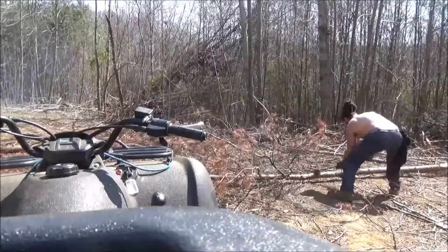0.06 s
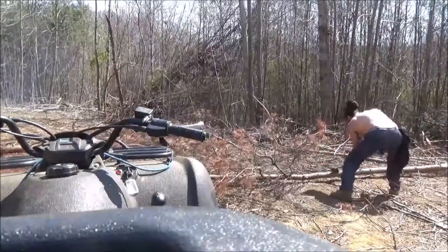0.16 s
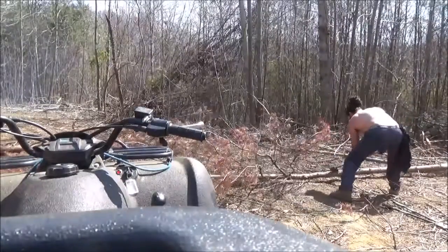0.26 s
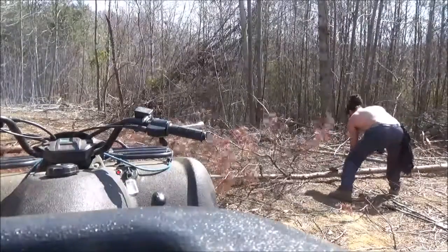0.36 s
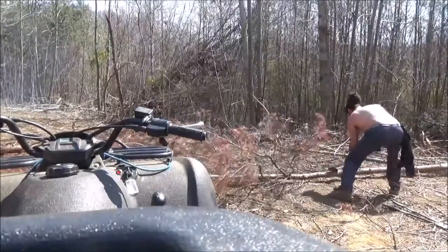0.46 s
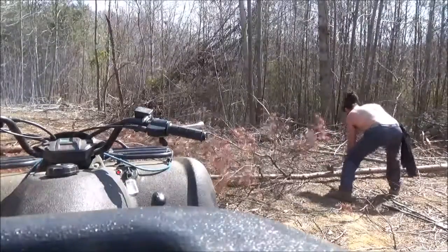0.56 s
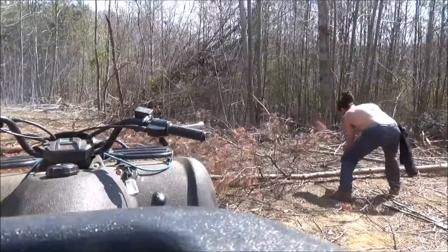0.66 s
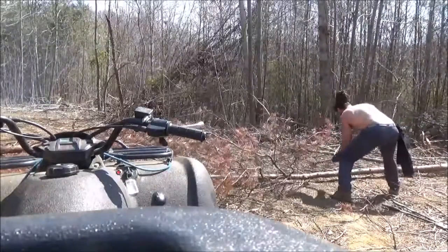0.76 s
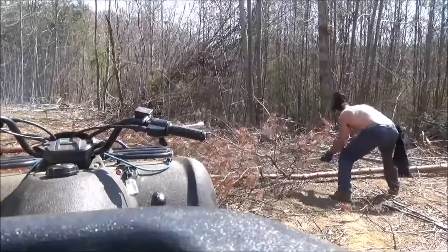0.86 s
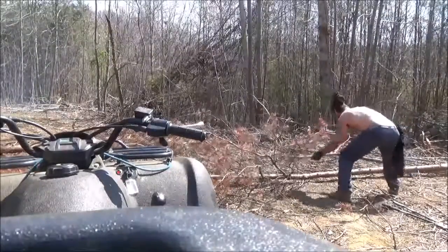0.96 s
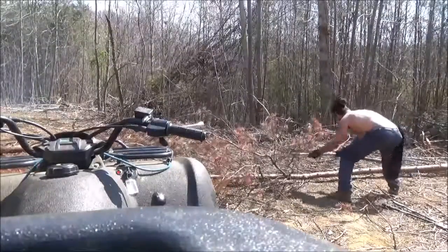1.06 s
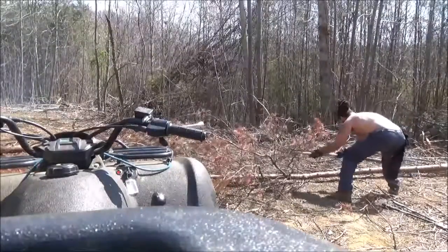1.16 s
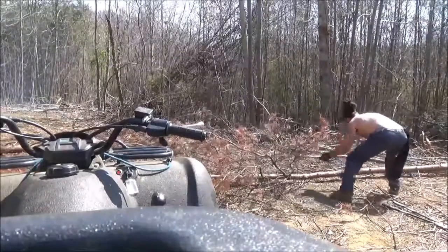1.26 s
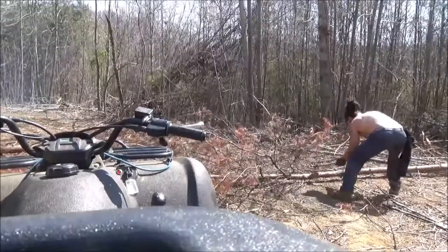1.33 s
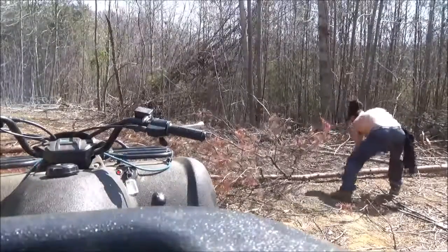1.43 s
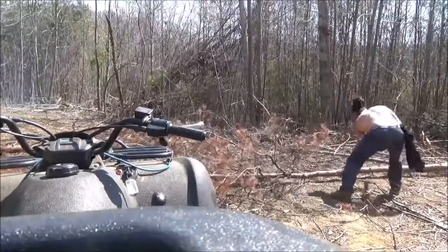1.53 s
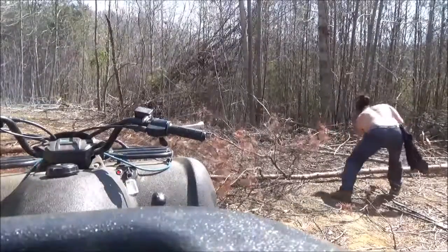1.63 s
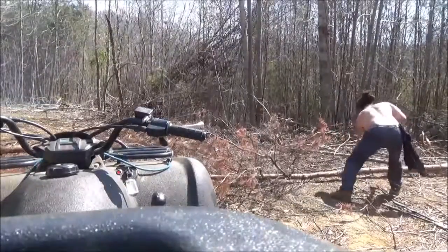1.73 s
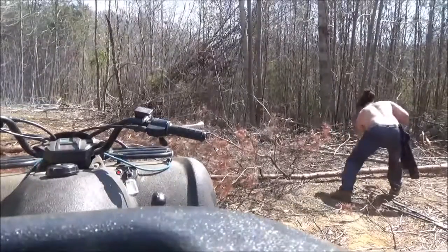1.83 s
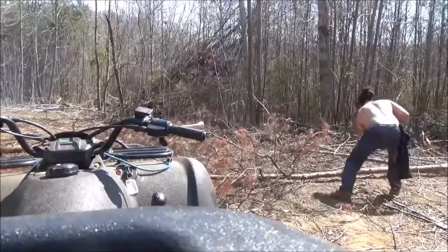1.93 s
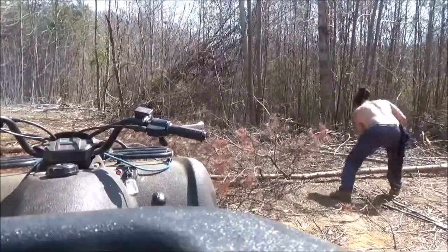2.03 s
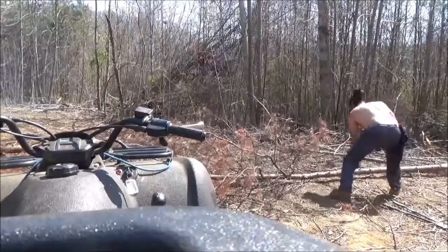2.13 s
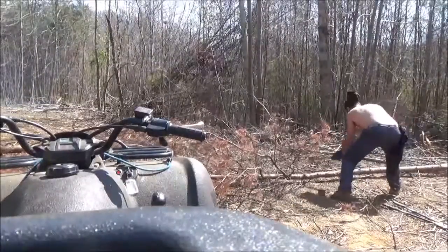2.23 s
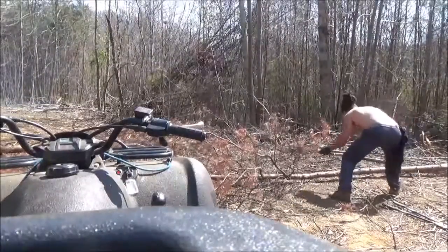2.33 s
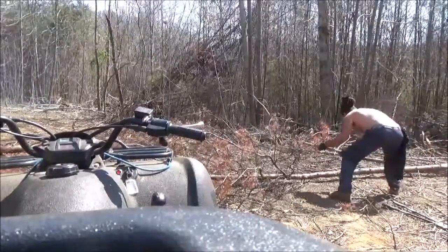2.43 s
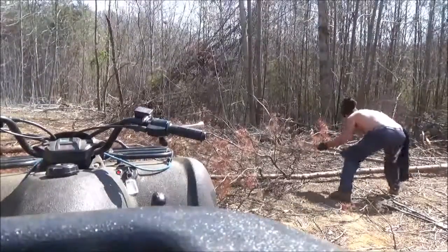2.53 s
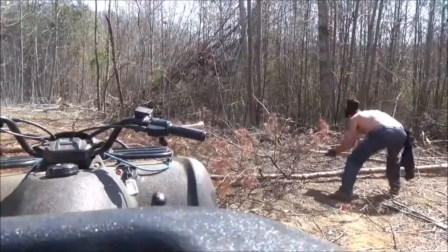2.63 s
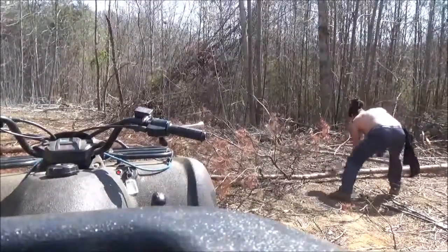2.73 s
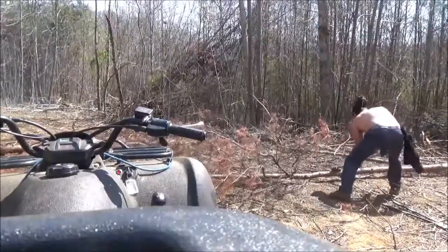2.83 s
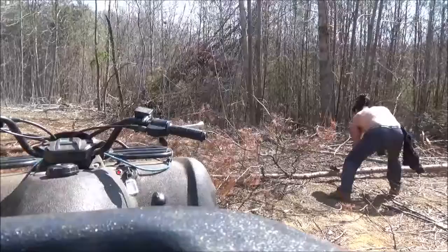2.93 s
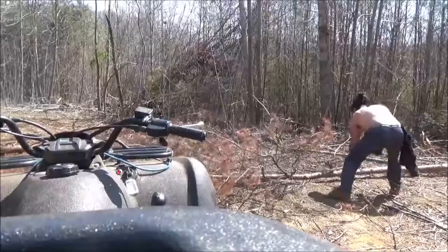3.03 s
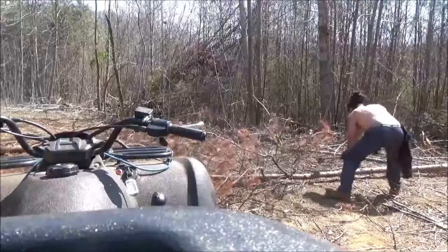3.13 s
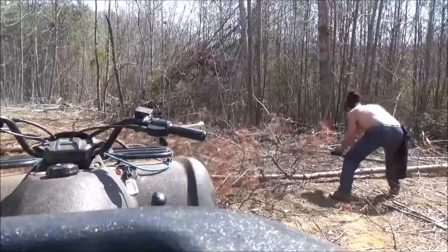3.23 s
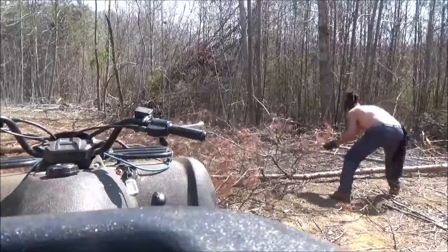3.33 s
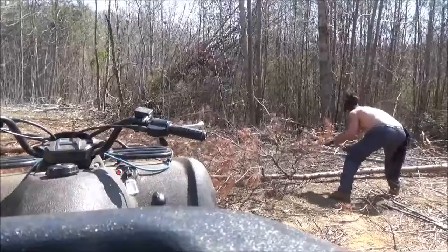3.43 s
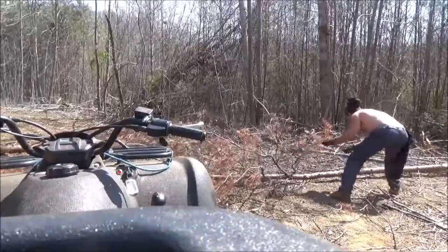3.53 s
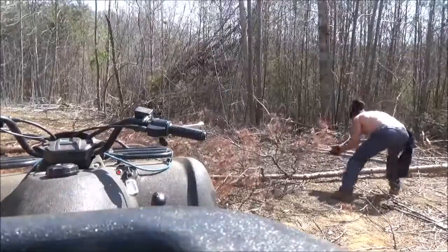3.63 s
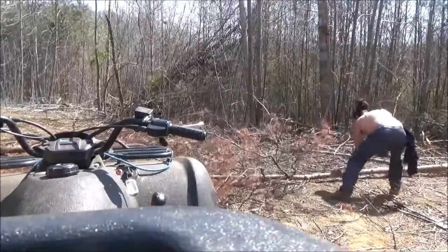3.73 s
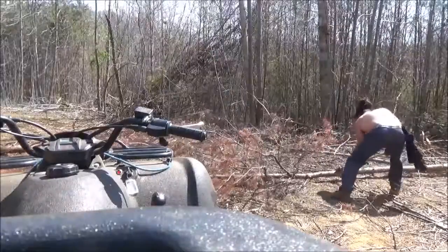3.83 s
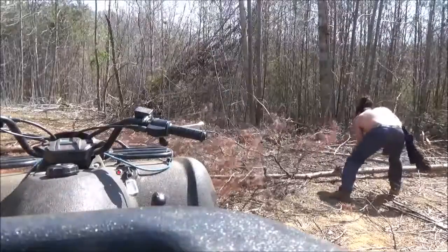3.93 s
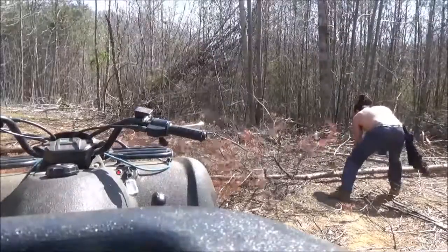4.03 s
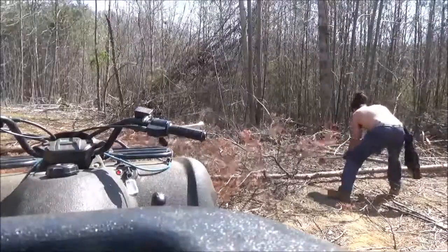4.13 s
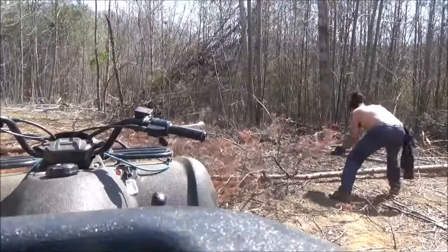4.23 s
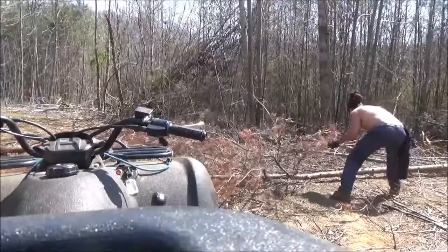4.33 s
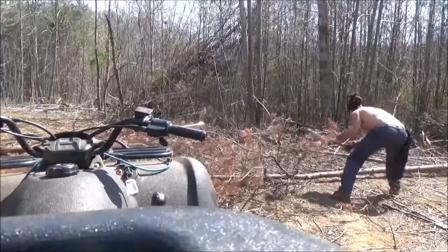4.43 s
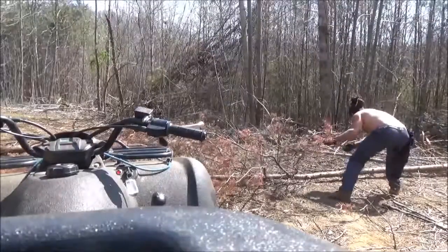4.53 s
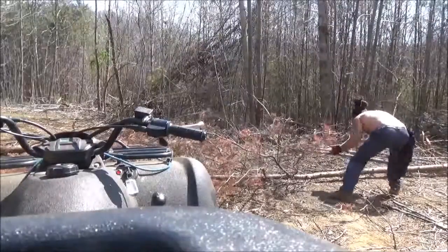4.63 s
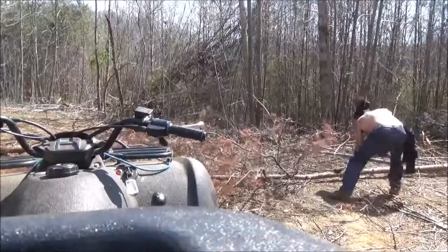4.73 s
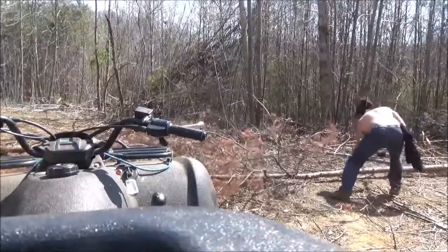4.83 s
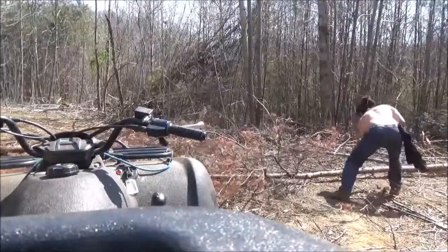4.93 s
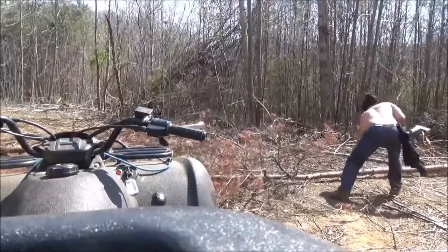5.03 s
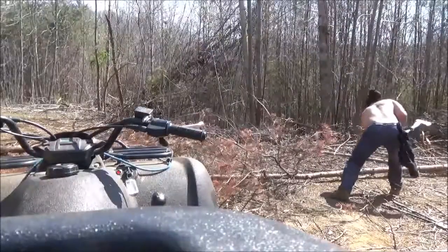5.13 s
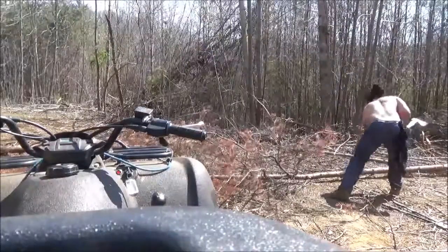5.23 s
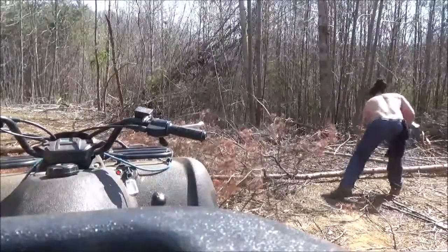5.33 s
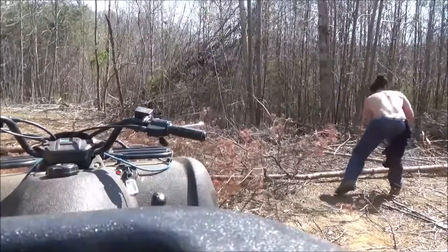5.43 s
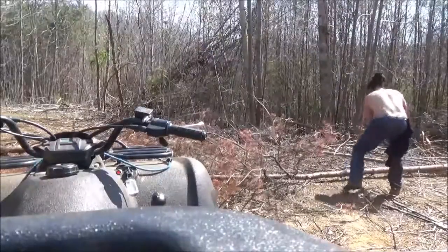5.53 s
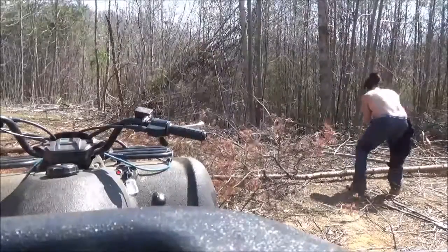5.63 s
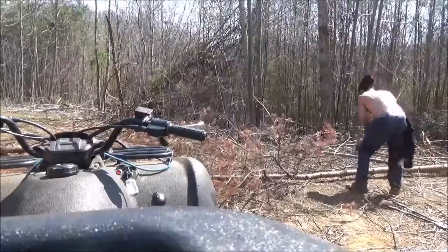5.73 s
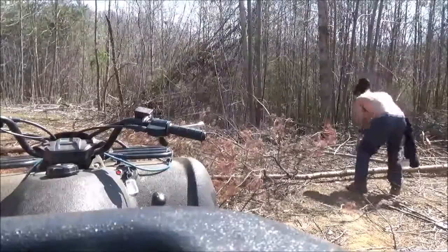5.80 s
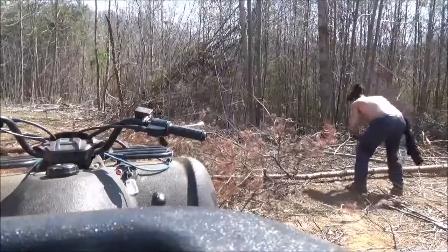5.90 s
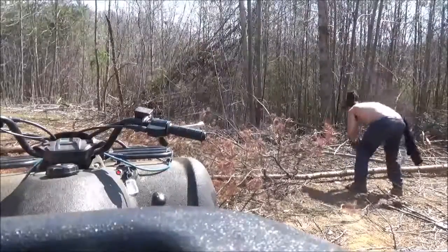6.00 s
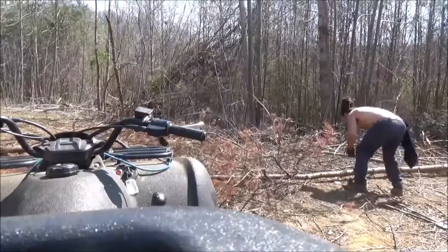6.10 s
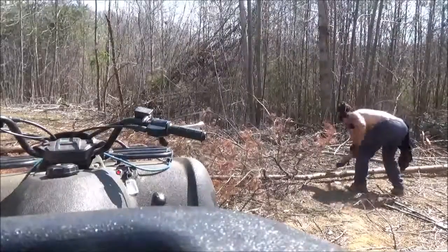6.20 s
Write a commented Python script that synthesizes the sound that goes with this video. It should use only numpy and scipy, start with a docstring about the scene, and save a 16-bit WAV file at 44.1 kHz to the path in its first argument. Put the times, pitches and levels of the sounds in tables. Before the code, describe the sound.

An axe chops dry limbs off a felled trunk in open woods, sharp woody cracks with twigs rattling and faint breeze between blows.

```python
"""An axe lops dry limbs off a thin felled trunk in a bare wood, some metres from a small stereo microphone.
Each blow is a thud pulse, then bending waves delayed by pitch; damped tones ring the trunk and the steel head.
Splitting fibres and snapping twigs are short sprays of noise ticks; low damped tones make soft thumps.
Dry needles rattle as dense ticks, and the trees scatter the wooden sounds back as a dying wash of noise.
A breeze rumbles on the microphone as lumpy low noise, over the coloured hush of the wood and faint hisses."""
import sys
import numpy as np
from scipy import signal
from scipy.fft import irfft
from scipy.io import wavfile

SR = 44100
rng = np.random.default_rng(int(sys.argv[2]) if len(sys.argv) > 2 else 0)


def voltage_ratio(level):
    """Linear amplitude factor for a level in decibels (scalar or array-like)."""
    return 10 ** (np.asarray(level, float) / 20)


def to_wav(s):
    """Save 16-bit WAV."""
    ch = np.atleast_2d(s).T  # columns
    pcm = np.round(np.clip(ch, -1, 1) * 32767)  # PCM
    wavfile.write(sys.argv[1], SR, pcm.astype(np.int16))


N = 276066   # length in samples

# The head meets solid wood; run_ms is the bending waves' trip to the near trunk end at 1 kHz.
# Columns: start_s, thud_db, waves_db, thud_hz, run_ms
BLOWS = [(0.062, -27.5, -33, 685, 9.3), (0.0797, -26, -15, 663, 10.5), (0.088, -26.0, -24, 616, 9.1),
         (0.0932, -17, -22, 550, 9.1), (0.1408, -13, -8, 790, 8.4), (0.1424, -29, -18, 606, 8.1),
         (1.3881, -7, -5.5, 600, 9.7), (1.4036, -9, -29, 850, 8.3), (1.4102, -16.0, -41, 450.0, 8.0),
         (2.748, -18, -9.5, 935, 8.85), (2.7583, -9, -3, 770.0, 8.7), (3.748, -9.5, -6.5, 754, 9.2),
         (3.7626, -9.5, -1, 797, 8.07), (4.7604, -13, -6.5, 740, 8.46), (4.7727, -38, -10, 617, 8.06),
         (5.6329, -30.5, -43, 900, 12), (6.1787, -7.5, -7, 670, 9.8), (6.2253, -5.5, -7.5, 776, 8.8)]
# Bending waves leave the trunk's ends; run_ratio multiplies the near run, air_ms is the head start in air.
# Columns: run_ratio, air_ms, level_db
TRUNK_PATHS = [(1, 2.56, 2), (1.85, 5.4, -8)]
# Low ringing tones of the log, before a chance change per blow; levels are relative to the blow.
# Columns: pitch_hz, level_db, t60_s (time to die by 60 dB)
TRUNK_MODES = [(330, -28.5, 0.063), (451, -19.5, 0.068), (579, -20, 0.17), (718, -24.5, 0.056),
               (1090, -24.5, 0.021)]
# Blunt contact: width in octaves and phase lead in radians, of the thud and of the waves
THUD_SHAPE, WAVES_SHAPE = (.5, .56), (.58, .66)
WAVES_PITCH_RATIO = .8   # the waves lie lower than the thud
BLOW_PAN_DB, THUMP_PAN_DB = -2.5, 1   # left over right

# The edge bites and the steel rings; ring_share is the part of the free ring time that is left.
# Columns: start_s, bite_db, low_modes_db, high_modes_db, ring_share
BITES = [(.039, -50, -62, -47, .5), (.0786, -31, -46, -32, .6), (.0917, -29, -36, -29, .8),
         (.1392, -14, -33, -38, .2), (.565, -42, -59, -50, .5), (1.385, -20, -38, -21, .25),
         (2.7461, -16.5, -21, -28, .1), (3.7465, -14.5, -19, -26, .12), (4.7581, -17, -27, -34, .95),
         (6.1786, -17, -46, -58, .4), (6.223, -36, -40, -58, .5)]
# Tones of the steel head, ringing freely; levels are relative to the low or high modes of the bite.
# Columns: pitch_hz, level_db, free_t60_s
HEAD_MODES = [(2283, 0, .3), (2318, -7, .2), (2390, -5, .05), (3000, -9, .3), (5200, 0, .12),
              (5340, -3, .12), (6050, -14, .2)]
BITE_COLOUR_DB, RING_LAG_S = (-1.5, 0.0, -15.5, -7.5), 0.002054   # colour: one value per crack band

# The four bands of the crack sounds. Columns: low_hz, high_hz
CRACK_BANDS = [(1000, 2030), (2150, 3810), (3600, 4980), (7200, 13000)]
# Fibres split. Columns: start_s, level_db, loudest_band (0 low to 3 high)
CRACKS = [(0.0528, -24.5, 2.57), (0.1055, -23.5, 3.3), (0.565, -31.5, 2.73), (0.9962, -27, 2.5),
          (1.01, -35, 2.1), (1.232, -41, 1.9), (1.244, -36.5, 1.65), (1.3906, -17.5, 2.6),
          (1.404, -14, 0.55), (1.4075, -13.5, 1.4), (1.4194, -20.5, 0.45), (2.756, -15.5, 0.91),
          (2.7578, -20, 2.76), (2.785, -25, 1.4), (2.806, -22, 2.27), (3.038, -40.5, 2.9),
          (3.7579, -18, 1.24), (3.76, -17.5, 1.8), (3.789, -28, 2.2), (3.825, -29.5, 3.1),
          (3.8337, -35, 2.9), (4.7694, -15, 1.6), (4.772, -15, 1.35), (4.8002, -21, 2.1),
          (5.003, -38.5, 1.4), (5.163, -38, 2.9), (5.369, -35, 2.44), (5.6712, -33.5, 3.1),
          (5.761, -43, 2.6), (6.1222, -35.5, 1), (6.1825, -17, 2.58), (6.2057, -26.5, 2.1)]
COLOUR_FALL_DB, FAR_BANDS_DB = 5.5, -9   # per band away from the loudest, down to a floor
# Each bite leaves a run of lesser splits; SPLIT_DB is relative to the bite
SPLIT_COUNT, SPLIT_SPAN_S, SPLIT_DB, SPLIT_FADE_DB_PER_S = 3, 0.19, -13, 110
# Twigs snap underfoot, duller. Columns: start_s, level_db
TWIGS = [(0.9469, -34.5), (1.213, -41), (2.908, -37), (5.281, -40), (5.2924, -31.5), (5.3259, -40.5),
         (5.632, -43), (5.68, -35.5), (5.865, -39)]
# Colour of a twig snap. Values: level_db for each crack band
TWIG_COLOUR_DB = (-2.5, 0.5, -12.5, -12.5)
# Stray ticks of settling twigs: how many in all, mean level, spread either way
STRAY_COUNT, STRAY_DB, STRAY_SPREAD_DB = 24, -50, 3.5

# The log drops against the ground, or a boot lands. Columns: start_s, level_db, pitch_hz
THUMPS = [(.142, -21.5, 160.5), (.958, -38, 492), (1.39, -28.5, 175), (2.75, -26, 181), (4.108, -40.5, 330),
          (5.657, -37.5, 522), (6.18, -26.5, 203)]
THUMP_T60_S = 0.061

# Blows, steps and tugs shake dry needles and leaves. Columns: start_s, level_db, t60_s, treble_lift_db
SHAKES = [(.04, -53, 0.27, 15.5), (0.111, -33.5, 0.39, 2.2), (.99, -46, 0.17, -4), (1.08, -42.5, 0.085, -7),
          (1.22, -40, .077, -15), (1.399, -35, 0.56, 4), (2.76, -33.5, 0.54, 4.5), (3.76, -38, 0.73, 3),
          (4.77, -30.5, 0.53, 2), (5.459, -51.5, 0.48, 7.5), (5.638, -45.5, 0.5, 2.5),
          (6.185, -33, 0.39, 3)]
SWELL_S = 0.02   # time constant of a shake's swell
# Leaves stirring between blows. Columns: start_s, level_db
RATTLE = [(0.0, -53.5), (0.54, -59.5), (6.26, -62)]
# Colour of the rattle. Columns: pitch_hz, level_db (relative, per Hz)
RATTLE_COLOUR = [(710, -45), (1200, -2.5), (2070, -6), (2340, -2), (2740, -2.5), (3030, -5.5),
                 (10400, -15.5), (11000, -13), (14300, -43), (22000, -120)]

# Scatter from the trees. Columns: pitch_hz, level_db, t60_s
WOODS = [(252, -45, 0.28), (520, -45.5, 0.36), (810, -48, 0.49), (1500, -40, 0.21), (3000, -44.5, 0.43),
         (4700, -43.5, 0.49), (6240, -41, 0.43), (9900, -36, 0.24)]

# Breeze on the microphone's ports, before it wavers. Columns: start_s, level_db
BREEZE = [(0.0, -59), (0.91, -56.5), (1.38, -48), (1.78, -47), (3.4, -60), (3.77, -57), (4.18, -65),
          (6.26, -62.5)]
BREEZE_LOW_DB = -0.5   # extra level of the deeper part
# One gust thumps the ports. Values: start_s, level_db, pitch_hz, t60_s
GUST = (1.188, -29, 62, .16)

# Colour of the hush. Columns: pitch_hz, level_db (relative, per Hz)
HUSH_COLOUR = [(18, -38), (30, -1), (77, 1.5), (106, 9), (149, -4), (346, -9), (709, -4.5), (802, -6),
               (1770, -19), (2500, -33), (3360, -38), (6710, -55.5), (7780, -87.5), (11000, -8),
               (14300, -68), (22000, -120)]
HUSH_DB = -51
# How alike left and right are in the rattle and the hush. Columns: pitch_hz, likeness (0 to 1)
LIKENESS = [(60, 1), (270, 1), (1200, 0.59), (2600, 0.55), (5500, 0.67), (11000, 0.68)]
# Thin wavering hisses. Columns: low_hz, high_hz, level_db, waver_db
FAINT_HISSES = [(2620, 2800, -70, 4.0), (7800, 8050, -78, 1.5)]


def trunk(size=4096):
    """A thud straight through the air, then bending waves whose high notes outrun the low, then the log's ring."""
    out, hz, early = np.zeros(N + size), np.fft.rfftfreq(size, 1 / SR), 400
    for start_s, thud_db, waves_db, thud_hz, run_ms in BLOWS:
        paths = 0
        for run_ratio, air_ms, level_db in TRUNK_PATHS:
            # speed grows with the root of pitch, so the phase lag does too
            cycles = (2 * run_ratio * run_ms * np.sqrt(1000 * hz) - air_ms * hz) / 1000
            paths = paths + voltage_ratio(level_db) * np.exp(-2j * np.pi * cycles)
        thud = voltage_ratio(thud_db) * contact(hz, thud_hz, *THUD_SHAPE)
        waves = voltage_ratio(waves_db) * contact(hz, WAVES_PITCH_RATIO * thud_hz, *WAVES_SHAPE) * paths
        at = round(start_s * SR) - early   # leaves room for the pulse's first half
        out[at:at + size] += np.roll(irfft(thud + waves), early)

    table = np.array(BLOWS)
    starts = (table[:, 0] * SR).astype(int)
    loudest_db = table[:, 1:3].max(axis=1)   # the thud or the waves
    for mode_hz, level_db, t60 in TRUNK_MODES:
        clicks = np.zeros(N + size)
        clicks[starts] = voltage_ratio(loudest_db + level_db + rng.normal(0, 1.9, len(table)))
        out += ring(clicks, mode_hz, t60)
    return out[:N]


def axe_head(size=16000):
    """The steel rings in several tones; wood gripping the blade shortens the ring."""
    out, click = np.zeros(N + size), np.arange(size) == 0
    for start_s, _, low_db, high_db, ring_share in BITES:
        at = round((start_s + RING_LAG_S) * SR)
        for hz, level_db, free_t60 in HEAD_MODES:
            group_db = low_db if hz < 4000 else high_db
            out[at:at + size] += voltage_ratio(level_db + group_db) * ring(click, hz, free_t60 * ring_share)
    return out[:N]


def crack_rows():
    """Start and four band levels of every bite, twig, crack, chance split and stray tick."""
    splits = []
    for start_s, bite_db, *_ in BITES:
        for lag, band_draw in rng.random((SPLIT_COUNT, 2)):
            lag_s = lag * SPLIT_SPAN_S
            level_db = bite_db + SPLIT_DB - SPLIT_FADE_DB_PER_S * lag_s
            if start_s + lag_s < N / SR:
                splits.append((start_s + lag_s, level_db, 3 * band_draw))
    for when, size, band_draw in rng.random((STRAY_COUNT, 3)):
        splits.append((when * N / SR, STRAY_DB + STRAY_SPREAD_DB * (2 * size - 1), 3 * band_draw))

    rows = [(start_s, *(level_db + np.array(BITE_COLOUR_DB))) for start_s, level_db, *_ in BITES]
    rows += [(start_s, *(level_db + np.array(TWIG_COLOUR_DB))) for start_s, level_db in TWIGS]
    for start_s, level_db, loudest_band in list(CRACKS) + splits:
        fall_db = np.maximum(-COLOUR_FALL_DB * abs(np.arange(4) - loudest_band), FAR_BANDS_DB)
        rows.append((start_s, *(level_db + fall_db)))
    return rows


def cracks(rise_s=0.00035, faint_t60=0.012, size=3000):
    """A dying spray of fibre ticks with its own colour and place; bigger splits last longer."""
    out, t = np.zeros((2, N + size)), np.arange(size) / SR
    for start_s, *levels_db in crack_rows():
        # noise with chance peaks makes the spray uneven
        peaks = voltage_ratio(4.2 * np.minimum(rng.exponential(1, size), 4))
        ticks = rng.standard_normal(size) * peaks
        t60 = faint_t60 * voltage_ratio(0.2 * (max(levels_db) + 48.5))
        shape = (1 - np.exp(-t / rise_s)) * voltage_ratio(-60 * t / t60)
        spray = 0
        for level_db, (low_hz, high_hz) in zip(levels_db, CRACK_BANDS):
            spray = spray + voltage_ratio(level_db) * rms_one(band(ticks * shape, low_hz, high_hz))
        spray = spray * np.sqrt(np.mean(shape ** 2))   # gives back the loudness of the shape
        at = round(start_s * SR)
        out[:, at:at + size] += panned(spray, rng.normal(-2.7, 2.5))
    return out[:, :N]


def thumps(soft_hz=900):
    """Soft low pushes, each a quickly dying tone on its own pitch."""
    out = np.zeros(N)
    for start_s, level_db, hz in THUMPS:
        out += voltage_ratio(level_db) * ring(click_at(start_s), hz, THUMP_T60_S)
    return band(out, 78, soft_hz)


def rattle(per_s=1200):
    """Dense uneven ticks of dry needles over their own hiss; each shake swells and dies."""
    shape = (2, 2, N)
    heights = voltage_ratio(2.5 * np.minimum(rng.exponential(1, shape), 5))
    ticks = (rng.random(shape) < per_s / SR) * heights * rng.choice([-1, 1], shape)
    hiss = voltage_ratio(1.0) * rng.standard_normal(shape)
    needles = panned(coloured(rms_one(ticks) + hiss, RATTLE_COLOUR), -1.2)
    treble = band(needles, 6500, 19000)
    start_s, level_db = np.transpose(RATTLE)
    level, lift = voltage_ratio(np.interp(np.arange(N) / SR, start_s, level_db)), np.zeros(N)
    for start_s, level_db, t60, treble_lift_db in SHAKES:
        t = np.maximum(np.arange(N) / SR - start_s, 0)
        shake = (1 - np.exp(-t / SWELL_S)) * voltage_ratio(level_db - 60 * t / t60)
        level += shake
        lift += shake * (voltage_ratio(treble_lift_db) - 1)
    return level * needles + lift * treble


def woods(x, onset_s=0.0019, alike=0.6, size=40000):
    """Trunks all around return a diffuse wash that swells briefly and dies band by band."""
    t, edges = np.arange(size) / SR, 150 * 2 ** np.arange(0, 6.6, .5)   # half octaves
    white, tail = rng.standard_normal((2, 2, size)), 0
    for k, (low, high) in enumerate(zip(edges, edges[1:])):
        hz = np.sqrt(low * high)
        fade_db = at_hz(WOODS, hz) - 60 * t / at_hz(WOODS, hz, column=2)
        tail = tail + band(white[k % 2], low, high) * voltage_ratio(fade_db)   # neighbours use separate noise
    mid, side = tail * (1 - np.exp(-(t / onset_s) ** 2))
    return signal.fftconvolve(left_right(mid, side, alike), x[None], axes=1)[:, :N]


def breeze():
    """Moving air on the ports makes lumpy low noise, mostly shared by left and right, and one gust."""
    start_s, level_db = np.transpose(BREEZE)
    breeze_db = np.interp(np.arange(N) / SR, start_s, level_db)
    white = rng.standard_normal((2, 2, N))
    low = voltage_ratio(breeze_db + BREEZE_LOW_DB + 2.0 * drift(3.4)) * rms_one(band(white[0], 39.5, 120))
    high = voltage_ratio(breeze_db + 2.5 * drift(14)) * rms_one(band(white[1], 90, 280))
    # the difference between left and right is weaker than the shared part
    mid, side = low * voltage_ratio([[0], [-12]]) + high * voltage_ratio([[0], [-7]])
    start_s, level_db, hz, t60 = GUST
    gust = voltage_ratio(level_db) * band(ring(click_at(start_s), hz, t60), 23, 160)
    return mid - gust + side * [[1], [-1]]


def hush():
    """The steady hush of the wood: coloured noise with a patchy flicker."""
    return voltage_ratio(HUSH_DB) * coloured(rng.standard_normal((2, 2, N)), HUSH_COLOUR)


def faint_hisses():
    """Narrow bands of noise, the same on both sides, whose levels waver slowly."""
    out = np.zeros(N)
    for low_hz, high_hz, level_db, waver_db in FAINT_HISSES:
        hiss = rms_one(band(rng.standard_normal(N), low_hz, high_hz))
        out += voltage_ratio(level_db + waver_db * drift(1.8)) * hiss
    return out


def contact(hz, centre_hz, octaves, lead):
    """Spectrum of a blunt contact: a one-cycle pulse, scaled to height 1 before its phase lead."""
    shape = np.exp(-.5 * (np.log2(hz / centre_hz + 1e-9) / octaves) ** 2)
    return shape / np.max(irfft(shape)) * np.exp(1j * lead)


def click_at(start_s):
    """Silence with a single unit click."""
    return 1. * (np.arange(N) == round(start_s * SR))


def ring(clicks, hz, t60):
    """A unit click sets a dying sine of height 1 ringing."""
    r, w = voltage_ratio(-60 / (t60 * SR)), 2 * np.pi * hz / SR
    return signal.lfilter([0, np.sin(w)], [1, -2 * r * np.cos(w), r * r], clicks + 1e-18)


def rms_one(x):
    """Scale to unit rms, the usual measure of loudness."""
    return x / np.sqrt(np.mean(x ** 2) + 1e-20)


def band(x, low_hz, high_hz):
    """Keep only the pitches between two limits (Butterworth band-pass)."""
    return signal.sosfilt(signal.butter(2, [low_hz, high_hz], "band", fs=SR, output="sos"), x)


def at_hz(points, hz, column=1):
    """Read a table column at a pitch, on a log-frequency axis."""
    points = np.array(points)
    return np.interp(np.log(hz), np.log(points[:, 0]), points[:, column])


def drift(rate_hz):
    """Slow random wander of spread 1, drawn every 40 samples and joined by lines."""
    r = np.exp(-80 * np.pi * rate_hz / SR)
    slow = signal.lfilter([1], [1, -2 * r, r * r], rng.standard_normal(N // 40 + 2002))[2000:]
    return np.interp(np.arange(N) / 40, np.arange(len(slow)), rms_one(slow))


def panned(x, left_db):
    """Make left louder than right by left_db; mono becomes stereo."""
    return x * voltage_ratio(np.array([[left_db / 2], [-left_db / 2]]))


def left_right(mid, side, alike):
    """Stereo from two separate noises, with a set likeness of left and right."""
    return np.sqrt(1 + alike) * mid + np.sqrt(1 - alike) * side * [[1], [-1]]


def coloured(sources, spectrum):
    """Stereo noise in third-octave bands, each with its level, flicker and likeness; rms 1."""
    out, edges = 0, 28 * 2 ** np.arange(0, 8.8, 1 / 3)
    for k, (low, high) in enumerate(zip(edges, edges[1:])):
        hz = np.sqrt(low * high)
        level_db = at_hz(spectrum, hz)
        if level_db < -60:   # too faint to matter
            continue
        mid, side = band(sources[k % 2], low, high)   # neighbours use separate noise
        gain = voltage_ratio(level_db + 2.5 * drift(11.8))
        out = out + gain * left_right(mid, side, at_hz(LIKENESS, hz))
    return rms_one(out)


def scene():
    """Blows, cracks and their scatter over rattle, breeze, hush and faint hisses."""
    blows = panned(band(trunk(), 155, 11000), BLOW_PAN_DB)
    wood = blows + panned(thumps(), THUMP_PAN_DB) + cracks()
    steel = panned(axe_head(), BLOW_PAN_DB)
    scatter = woods(wood.mean(axis=0))
    return wood + steel + scatter + rattle() + breeze() + hush() + faint_hisses()


def band_limit(x):
    """A steep low-pass at the top of the band."""
    return signal.sosfilt(signal.butter(12, 12150, fs=SR, output="sos"), x)


def record(dry):
    """The top is cut steeply: 55 dB down from 11560 Hz upward."""
    low_pass = signal.cheby2(16, 55, 11560, fs=SR, output="sos")
    mix = signal.sosfilt(low_pass, dry)
    return band_limit(mix)


dry = scene()
out = record(dry)
to_wav(out)
```